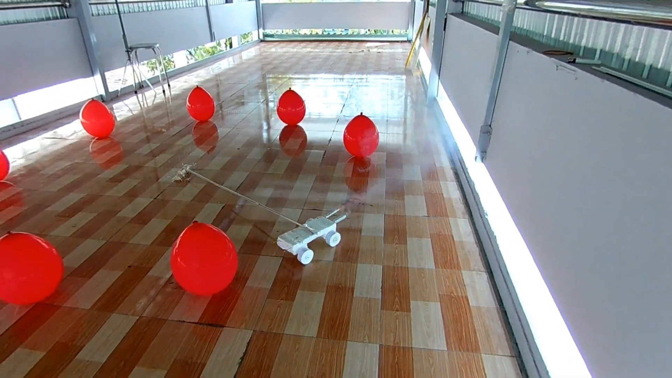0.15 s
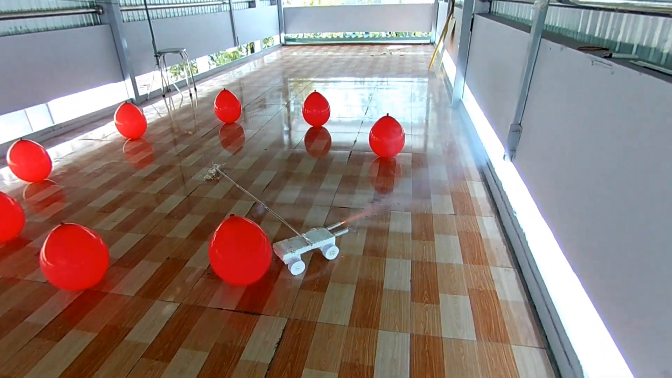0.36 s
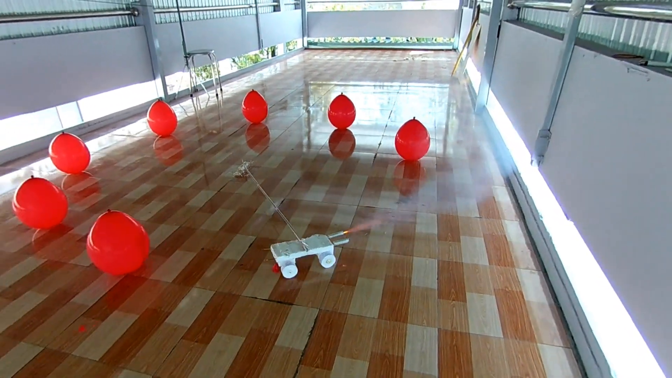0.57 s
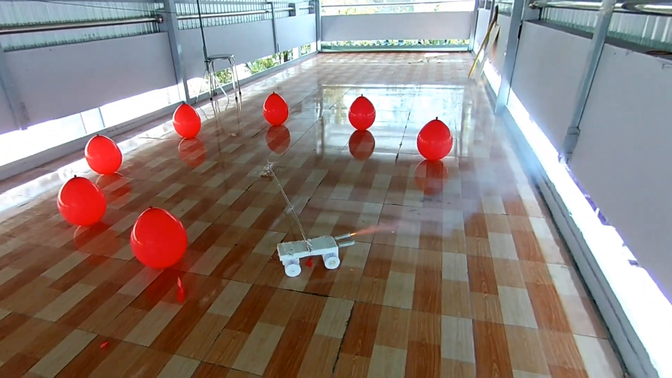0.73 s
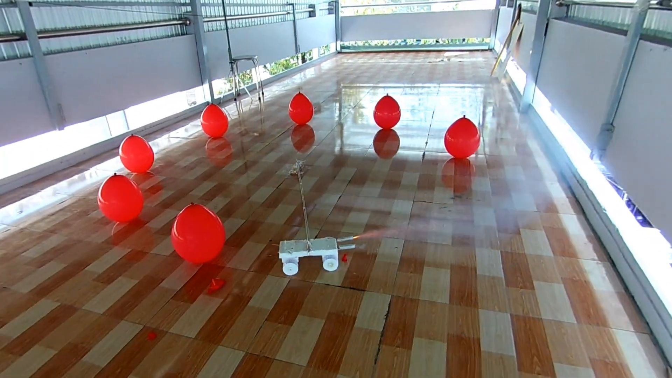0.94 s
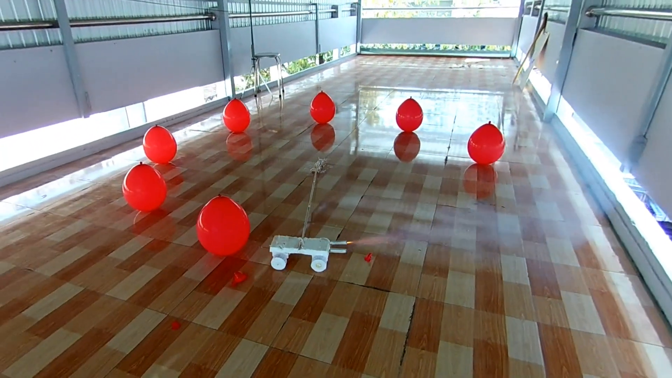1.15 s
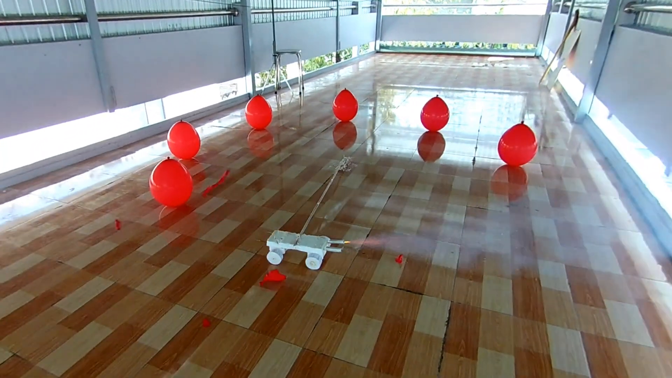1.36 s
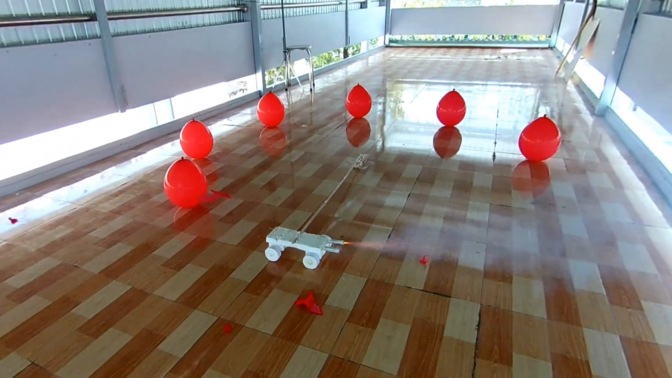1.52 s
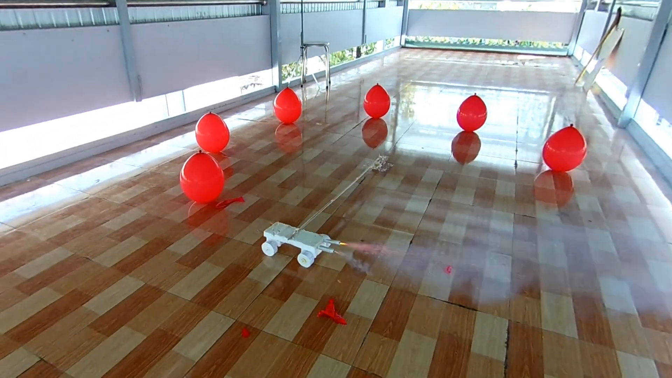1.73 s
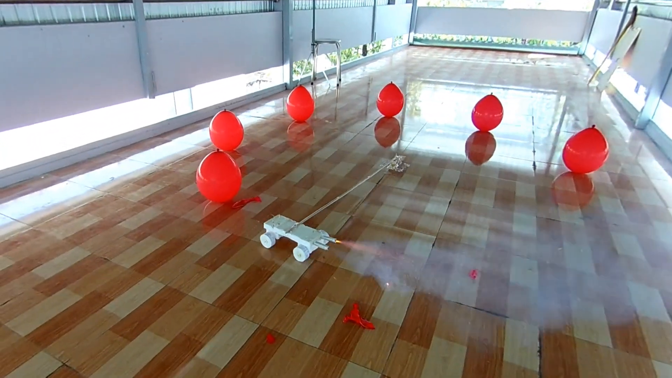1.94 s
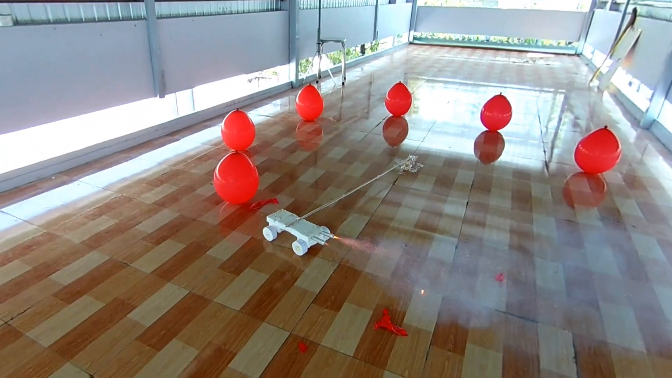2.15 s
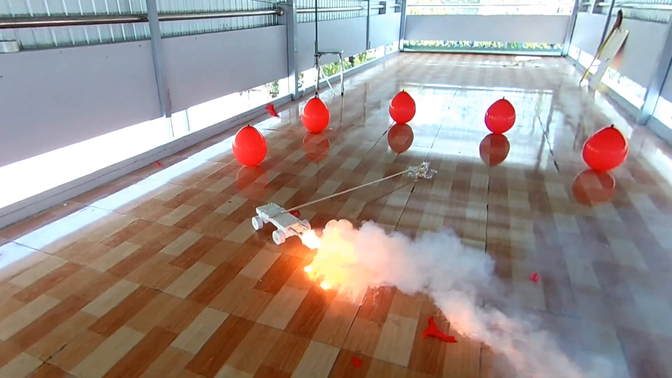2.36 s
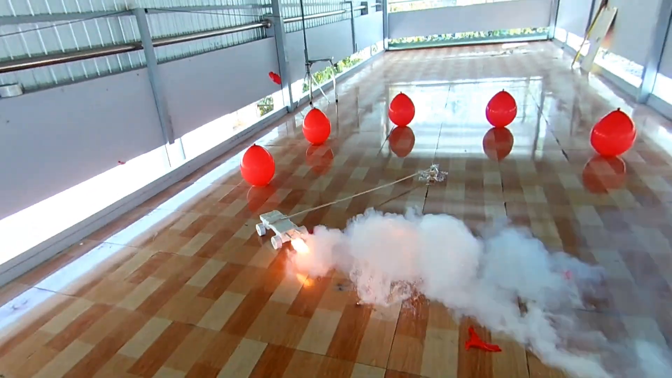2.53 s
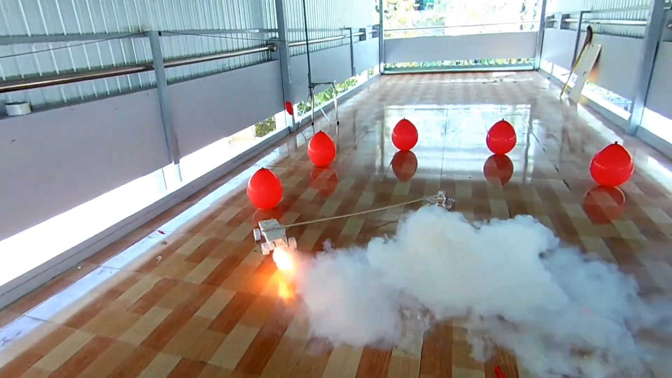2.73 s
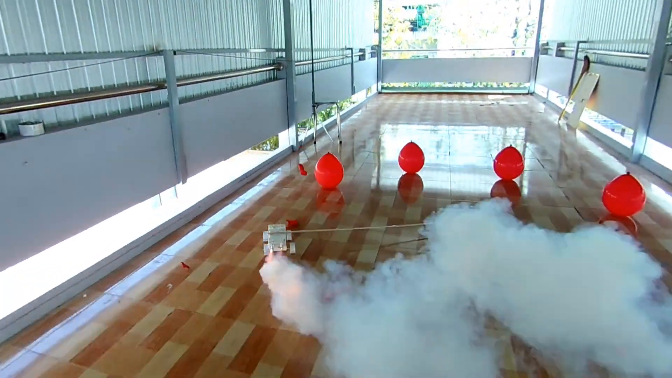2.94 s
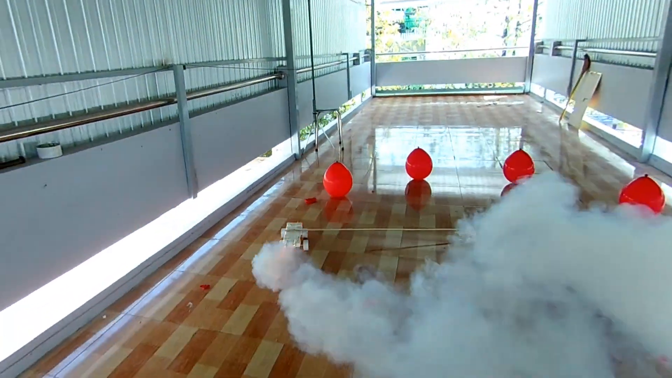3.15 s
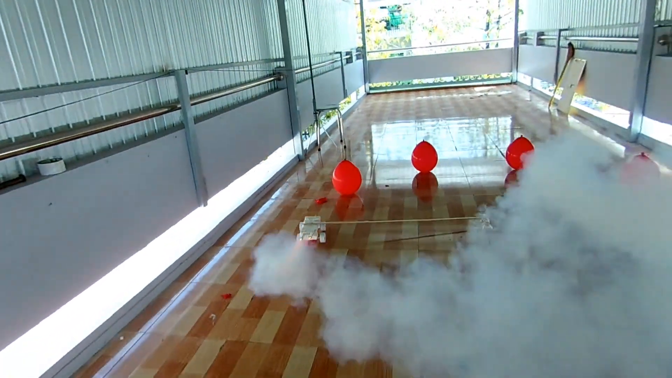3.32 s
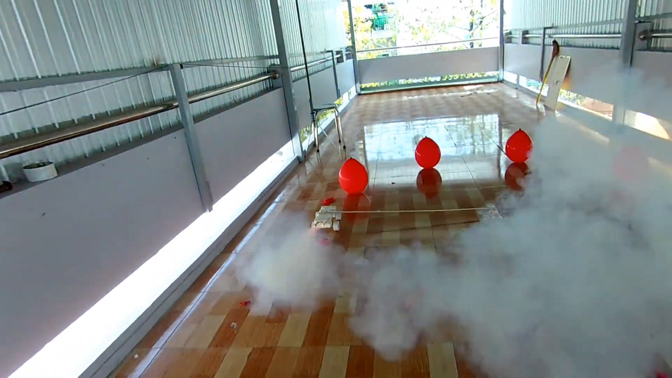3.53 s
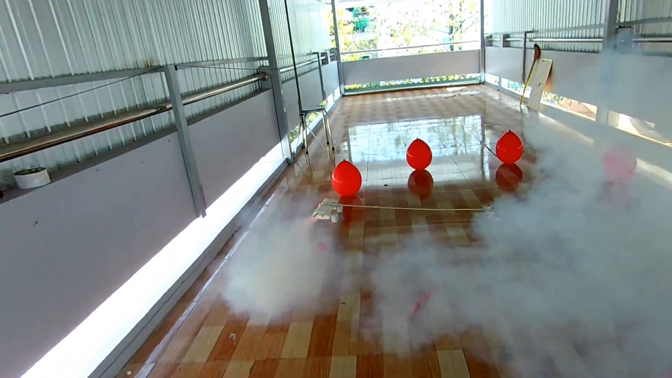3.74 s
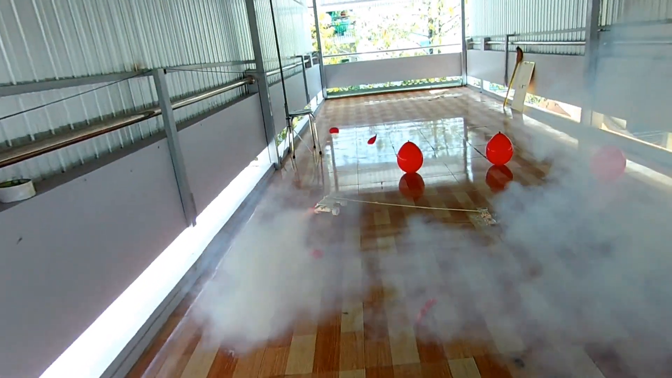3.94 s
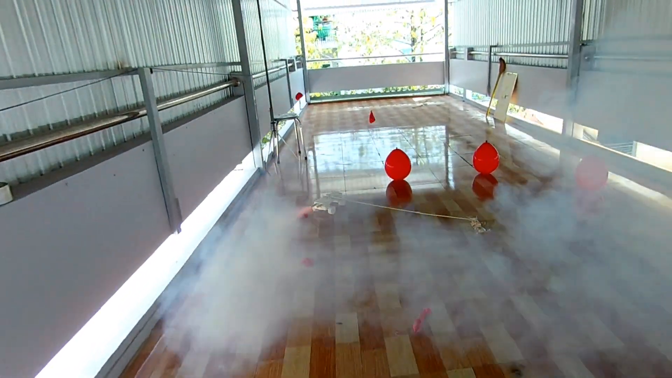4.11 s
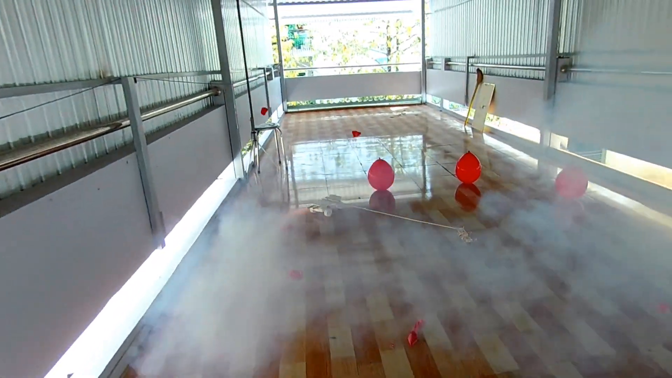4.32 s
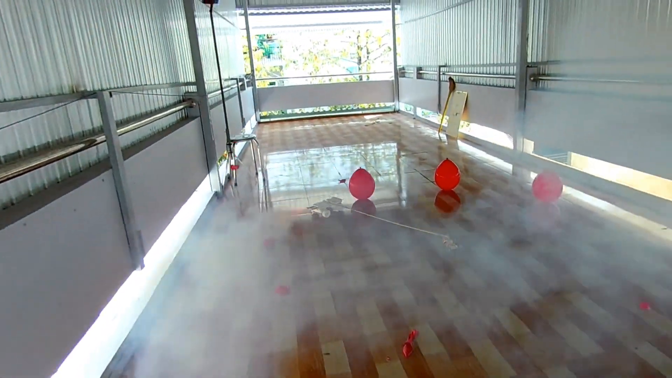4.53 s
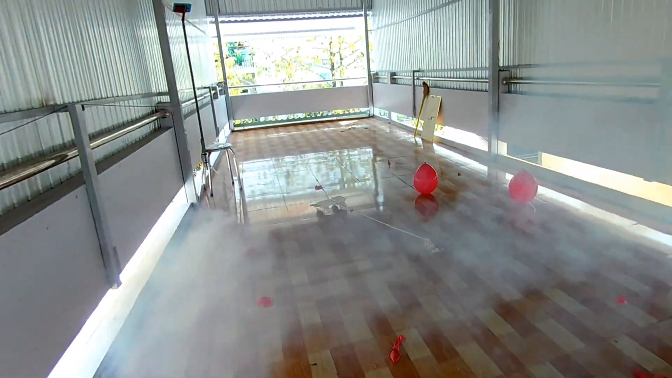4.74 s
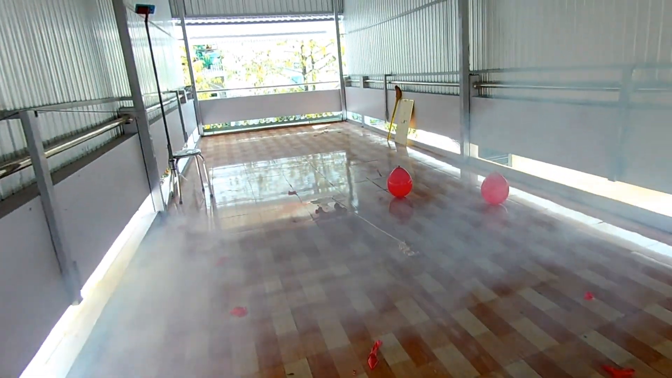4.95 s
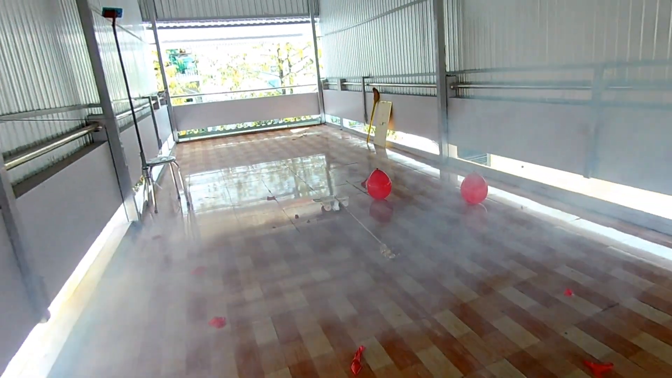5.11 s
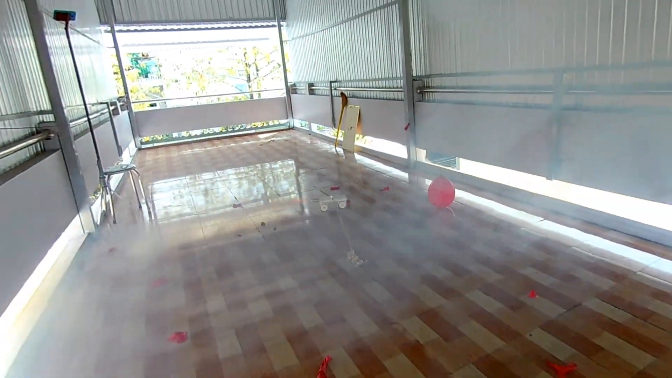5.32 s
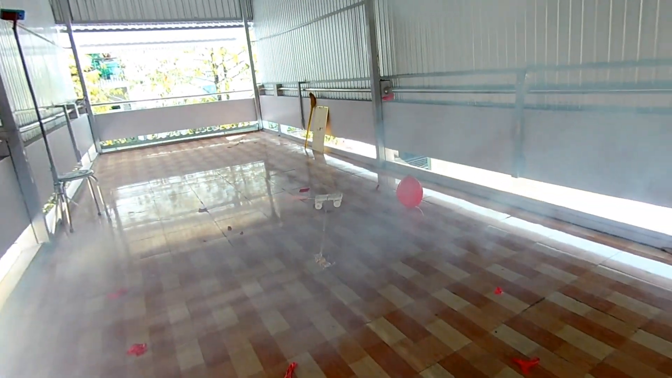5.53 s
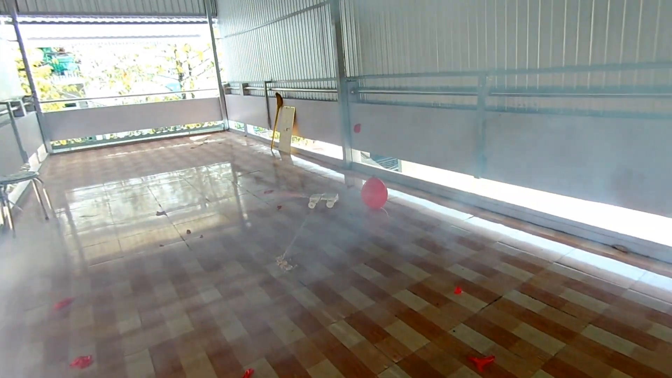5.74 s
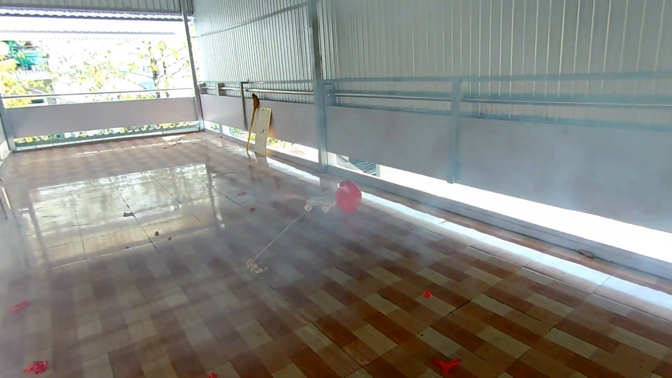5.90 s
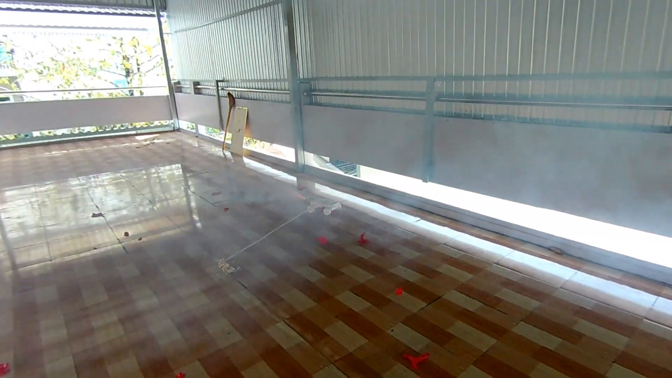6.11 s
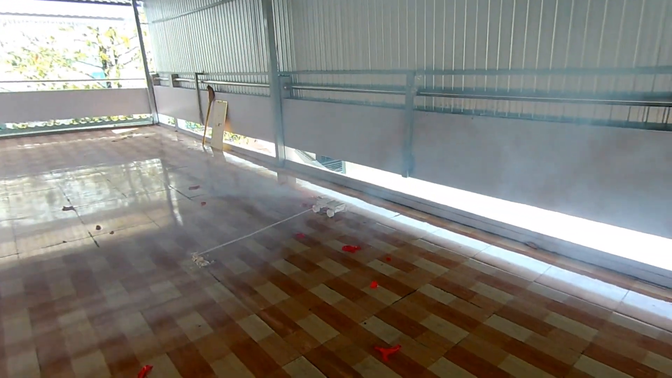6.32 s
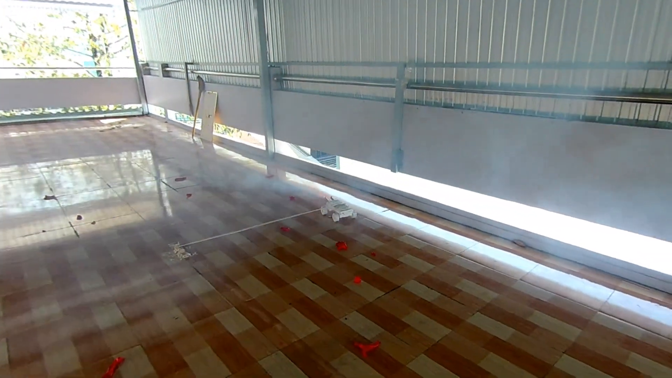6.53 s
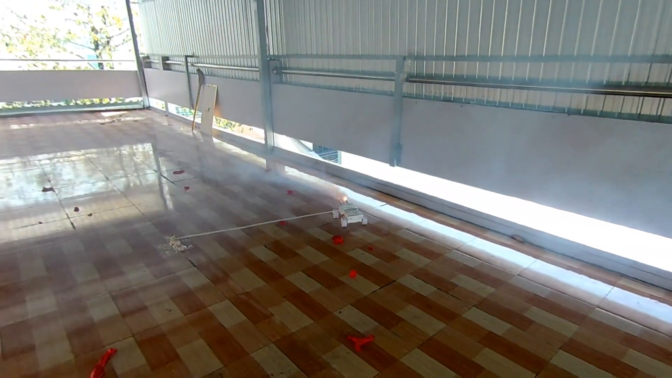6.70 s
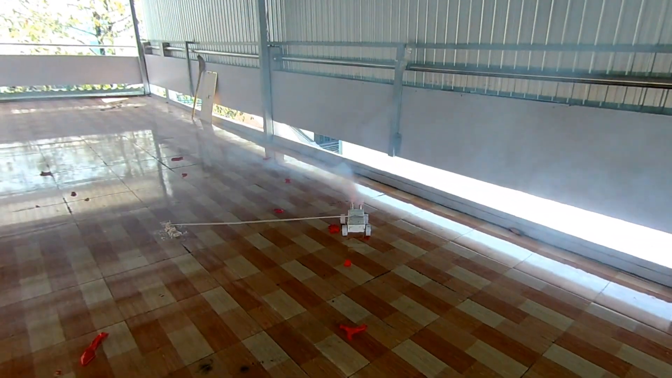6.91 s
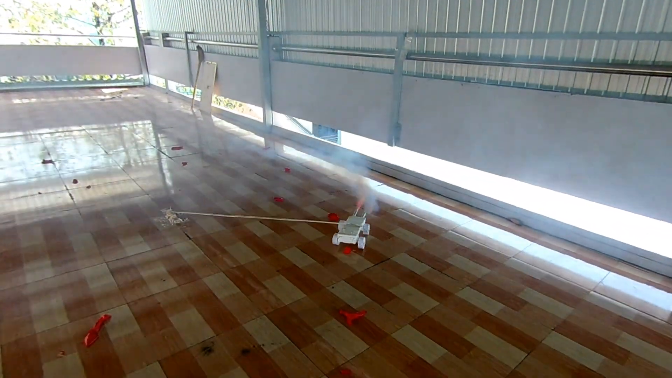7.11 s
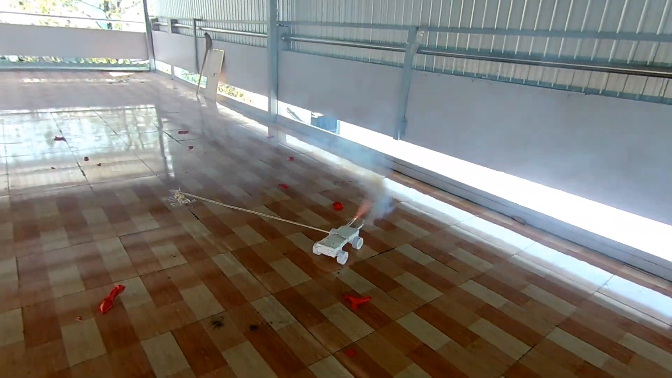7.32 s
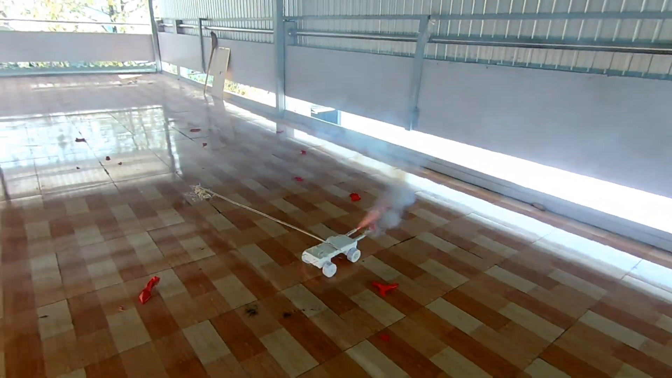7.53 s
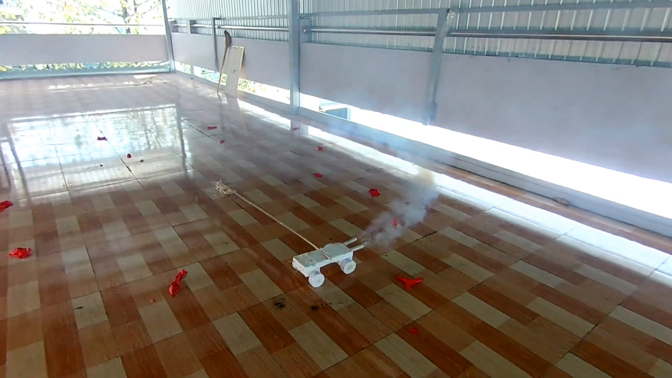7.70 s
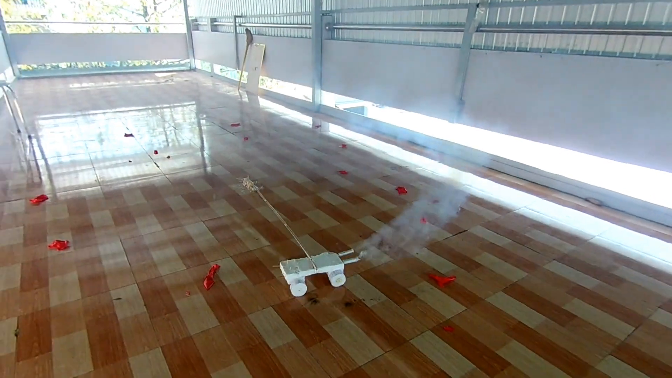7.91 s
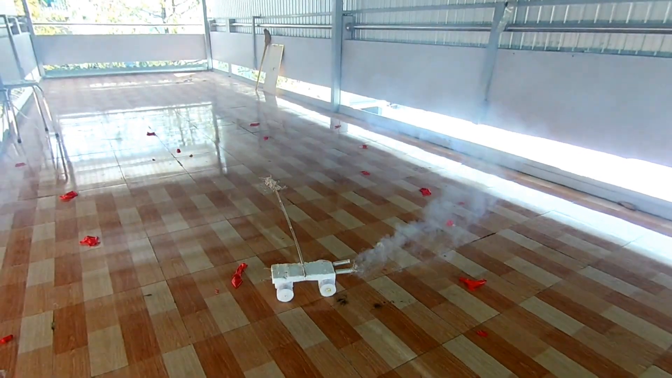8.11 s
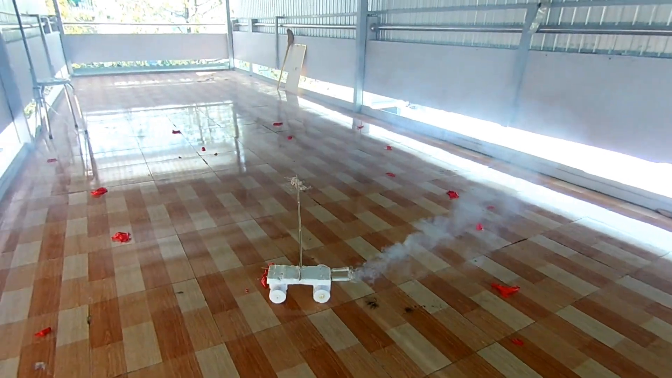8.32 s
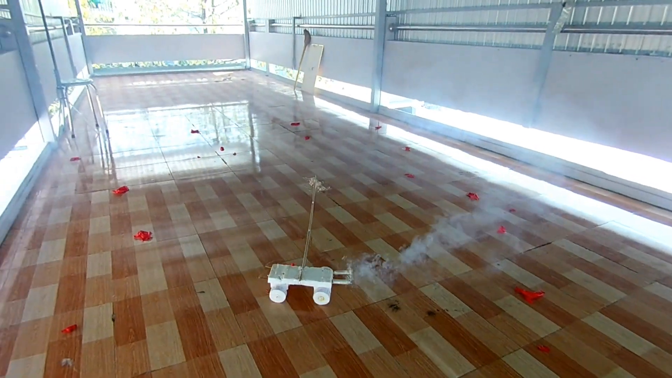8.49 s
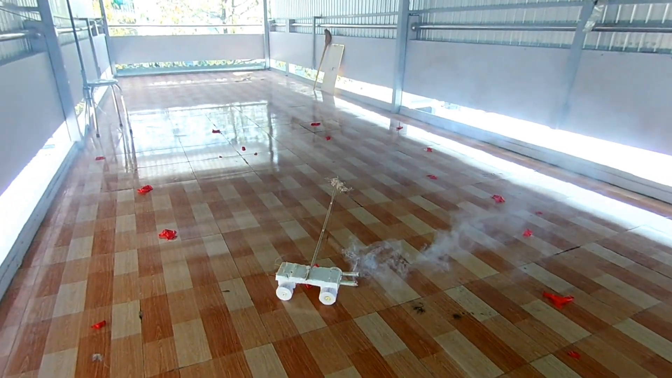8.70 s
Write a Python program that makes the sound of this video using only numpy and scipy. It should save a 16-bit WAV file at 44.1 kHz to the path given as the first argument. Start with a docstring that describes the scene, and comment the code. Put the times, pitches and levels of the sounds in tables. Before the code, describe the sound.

A small rocket motor on a toy car hisses steadily in a large, echoing hall. Balloons burst one after another, a little under a second apart, each sharp bang ringing out and overloading the microphone. Early on, a brief fizz and a quick double bang break the pattern. After the last pop the hiss carries on, growing duller, then the motor spits briefly and dies away.

```python
"""Balloons burst one after another, popped by a toy rocket car circling on a tether in a metal-walled hall.
Each bang is a crack and a shock front that ring through the long hall and overload the microphone.
The motor's turbulent jet hisses throughout, with dull thuds here and there; a fuse fizzes and lights
a second charge with a bang. At last the motor spits sparks and its thrust dies away."""
import sys
import numpy as np
from scipy import signal
from scipy.fft import rfft, irfft
from scipy.io import wavfile
from scipy.ndimage import uniform_filter1d

SR = 44100
rng = np.random.default_rng(int(sys.argv[2]) if len(sys.argv) > 2 else 0)


def wrap_up_sound(samples):
    """Save the sound to the file named by the first command line argument, as 16-bit audio."""
    columns = np.atleast_2d(samples).T
    # keep every value between -1 and 1, then stretch to whole-number steps
    tamed = np.clip(columns, -1, 1)
    steps = np.round(tamed * 32767).astype(np.int16)
    wavfile.write(sys.argv[1], SR, steps)


N = 390575


def gain_of(db):
    """dB to amplitude."""
    return 10 ** (np.asarray(db) / 20)


def unit_rms(x):
    """Scale to rms 1."""
    return x / np.sqrt(np.mean(x ** 2) + 1e-20)


def log_interp(points, hz):
    """Interpolate (hz, value) points over log frequency."""
    point_hz, value = np.transpose(points)
    return np.interp(np.log(hz + 1), np.log(point_hz + 1), value)


def add(mix, start_s, sound):
    """Mix a sound in at start_s."""
    part = mix[round(start_s * SR):][:len(sound)]
    part += sound[:len(part)]


def below(hz, corner_hz):
    """Shelf: 1 under the corner, 0 over it."""
    return 1 / (1 + (hz / corner_hz) ** 4)


def bump(hz, centre_hz, octaves):
    """Broad resonance, height 1."""
    return np.exp(-(np.log2((hz + 1) / centre_hz) / octaves) ** 2)


def smooth_noise(shape, *widths):
    """Noise averaged over one width per axis; rms 1."""
    noise = rng.standard_normal(shape)
    for axis, width in enumerate(widths):
        noise = uniform_filter1d(noise, size=width, axis=axis)
    return unit_rms(noise)


def tinted(noise, colour):
    """Shape noise by (hz, gain_db) points; rms 1."""
    hz = np.fft.rfftfreq(len(noise), 1 / SR)
    return unit_rms(irfft(rfft(noise) * gain_of(log_interp(colour, hz)), len(noise)))


def minimum_phase(x, colour, size=4096):
    """Causal filter from (hz, gain_db) points."""
    hz = abs(np.fft.fftfreq(size, 1 / SR))
    log_gain = np.log(gain_of(log_interp(colour, hz)))
    taps = np.fft.ifft(np.exp(np.conj(signal.hilbert(log_gain)))).real
    return signal.oaconvolve(x, taps[:size // 2])[:len(x)]


def hall_air(level_db=-51):
    """Still air of the hall: faint, low noise."""
    # air spectrum: freq_hz, gain_db
    air_colour = [(25, -6), (60, 1.5), (130, -1.5), (250, -5.5), (380, -7.5), (520, -15), (900, -18.5),
                  (1450, -23), (2200, -36), (3200, -35.5), (15000, -44)]
    return gain_of(level_db) * tinted(rng.standard_normal(N), air_colour)


def hall_rings_db(hz):
    """Boost from narrow resonances of the hall and its sheet walls."""
    # resonances: centre_hz, width_hz, boost_db
    rings = [(160, 13, 3.5), (193, 20, 1), (219, 25, 3), (302, 30, 4.5), (460, 12, 0), (595, 73, 3.5),
             (1075, 43, 2.5), (1320, 26, 0.5), (1743, 49, 4.5), (2800, 72, 2.5), (3840, 98, 2)]
    return sum(db / (1 + (2 * (hz - centre_hz) / width_hz) ** 2) for centre_hz, width_hz, db in rings)


def hall_tail(tint_db, grain_db, ripple_db=1.0, size=65536):
    """Dense, uneven reflections, coloured by tint_db(hz); each band decays at its own rate."""
    # spectrum of a bang as the hall returns it: freq_hz, gain_db
    echo_colour = [(30, -19.5), (80, -21.5), (160, -2), (300, 0), (550, -1), (830, -3.5), (1250, -1.5),
                   (1750, -7), (2300, -13.5), (3200, -18.5), (5000, -26.5), (7000, -28.5), (9000, -29),
                   (15000, -37.5)]
    # reverberation: freq_hz, t60_s
    decay_times = [(60, 0.2), (130, 0.52), (300, 0.68), (1200, 0.77), (2500, 0.81), (5000, 0.81),
                   (9000, 0.51), (15000, 0.38)]
    hz = np.fft.rfftfreq(size, 1 / SR)
    strength = gain_of(grain_db * smooth_noise(size, 90))
    echoes = rng.standard_normal(size) * strength
    modes_db = ripple_db * smooth_noise(len(hz), 90)  # each spot stirs its own mix of room modes
    colour_db = log_interp(echo_colour, hz) + hall_rings_db(hz) + modes_db + tint_db(hz)
    echoes = unit_rms(irfft(rfft(echoes) * gain_of(colour_db)))
    band_hz, t, bands = signal.stft(echoes, SR, nperseg=512)
    decay = gain_of(-60 * t / log_interp(decay_times, band_hz)[:, None])
    return signal.istft(bands * decay, SR, nperseg=512)[1][:size]


def fizz(spread_db=4):
    """Spark showers: the fuse burns into the second charge; the motor spits near its end."""
    # showers: peak_s, level_db, swell_db_per_s, fade_db_per_s
    showers = [(2.227, -19.5, 390, 470), (7.375, -46, 2000, 93), (7.63, -58, 600, 200)]
    # spark spectrum: freq_hz, gain_db
    spark_colour = [(200, -20), (900, 3), (2000, -2), (4000, -5), (8500, -11.5), (11500, -4.5),
                    (15000, -13)]
    t = np.arange(N) / SR
    envelope = sum(gain_of(level_db - np.where(t < peak_s, swell * (peak_s - t), fade * (t - peak_s)))
                   for peak_s, level_db, swell, fade in showers)
    sparks = rng.standard_normal(N) * gain_of(spread_db * rng.exponential(1, N).clip(0, 5))
    return tinted(sparks, spark_colour) * envelope


def thud(level_db, pitch_hz, ring_db, push_s=0.0071, dull_db=6, fade_s=0.13, rise_s=0.002):
    """Dull thud: a soft low knock or sputter with a short hall ring."""
    tail = hall_tail(lambda hz: dull_db * below(hz, 2 * pitch_hz), grain_db=2.0)
    t = np.arange(len(tail)) / SR
    push = np.sin(2 * np.pi * pitch_hz * t) * np.exp(-t / push_s)
    ring = gain_of(ring_db) * tail * np.exp(-t / fade_s)
    onset = 1 - np.exp(-t / rise_s)
    return gain_of(level_db) * (2 * push + ring) * onset


def burn(t, burnout_s=7.474, burnout_db_per_s=19, dull_delay_s=0.1, dull_ramp_s=0.35, dull_db=7.5):
    """Jet level, rumble and brightness in dB: sag as the nozzle wears wider, surges, burn-out."""
    # thrust surges: peak_s, level_db, rumble_db, brightness_db, rise_s, ebb_s
    surges = [(0.166, 1.5, 4.5, 1.5, 0.18, 0.18), (2.7, 3.0, 2, -0.6, 0.52, 3),
              (7.03, 2, -0.5, -1.5, 0.25, 0.12), (7.86, 3.0, -2, -1, 0.04, 0.11)]
    thrust_db = -35.5 - 0.1262 * t
    rumble_db = 1.0 - 0.74 * t
    bright_db = 1.47 - 0.75 * t
    # pressure falls; soon the jet is too slow to hiss
    thrust_db -= burnout_db_per_s * np.maximum(t - burnout_s, 0)
    bright_db -= dull_db * np.clip((t - burnout_s - dull_delay_s) / dull_ramp_s, 0, 1)
    for peak_s, more_db, more_rumble_db, more_bright_db, rise_s, ebb_s in surges:
        surge = np.exp(-((t - peak_s) / np.where(t < peak_s, rise_s, ebb_s)) ** 2)
        thrust_db += more_db * surge
        rumble_db += more_rumble_db * surge
        bright_db += more_bright_db * surge
    return thrust_db, rumble_db, bright_db


def jet(flutter_db=0.02, patchy_db=1.12, chug_db=3.0, drift_db=0.92, hollow=0.25):
    """Turbulent exhaust: hisses, chugs in the bass, turns hollow as pressure falls."""
    # exhaust spectrum: freq_hz, gain_db
    jet_colour = [(30, -8.5), (80, -8), (160, 1.5), (220, -5), (380, 0), (480, -2.5), (600, -0.5),
                  (800, -1.5), (1250, -0.5), (1750, -6), (2300, -9), (3900, -13), (7000, -19), (15000, -29)]
    exhaust = tinted(rng.standard_normal(N), jet_colour)
    hz, t, bands = signal.stft(exhaust, SR, nperseg=1024, noverlap=768)
    hz = hz[:, None]
    thrust_db, rumble_db, bright_db = burn(t)
    flutter, chug = smooth_noise(len(t), 5), smooth_noise(len(t), 5)
    patches = smooth_noise(bands.shape, 12, 10)
    drift = smooth_noise(bands.shape, 70, 2)  # reflections add and cancel as the car circles
    texture_db = flutter_db * flutter + patchy_db * patches + drift_db * drift + .5 * hall_rings_db(hz)
    bass_db = below(hz, 380) * (rumble_db + chug_db * chug)
    # the finest hiss follows brightness most; a weak jet keeps the breathy ring of its tube
    hiss = (1 - below(hz, 2307)) + .7 * (1 - below(hz, 6500))
    tube = hollow * bump(hz, 1550, octaves=0.46)
    tilt_db = (hiss - tube) * bright_db
    # faint nozzle whistle at full pressure
    whistle_db = 2.0 * bump(hz, 3800, octaves=.06) * np.clip(gain_of(2 * bright_db), 0, 2)
    bands *= gain_of(thrust_db + bass_db + tilt_db + texture_db + whistle_db)
    return signal.istft(bands, SR, nperseg=1024, noverlap=768)[1][:N]


def bang(level_db, bass_db, treble_db, low_hz, low_db, high_hz, high_db, echo_s, crack_db,
         swing_hz=450, crack_s=0.0018, near_db=1.0, near_s=0.014,
         hall_db=-3.0, build_s=0.0025, echo_db=-7, echo_width_s=0.012):
    """Crack and shock front; the freed air swings; floor and near walls answer, then the whole hall."""
    def tint_db(hz):
        """Colour of this bang's reflections."""
        rings_db = low_db * bump(hz, low_hz, octaves=0.34) + high_db * bump(hz, high_hz, octaves=0.23)
        return rings_db + bass_db * below(hz, 300) + treble_db * (1 - below(hz, 2200))

    tail = hall_tail(tint_db, grain_db=0.5)
    t = np.arange(len(tail)) / SR
    pressure = gain_of(11) * (1 - np.exp(-t / .0001)) * np.exp(-t / .003)  # far over full scale
    blast = -pressure * (np.cos(2 * np.pi * swing_hz * t) + .5 * np.sin(2 * np.pi * high_hz * t))
    crack = gain_of(crack_db) * rng.standard_normal(len(t)) * np.exp(-t / crack_s)
    near = gain_of(near_db) * np.exp(-t / near_s)
    wall_echo = gain_of(echo_db) * np.exp(-((t - echo_s) / echo_width_s) ** 2)
    reflections = tail * (1 - np.exp(-t / build_s)) * (1 + near + wall_echo)
    return gain_of(level_db) * (crack + blast + gain_of(hall_db) * reflections)


def scene():
    """Jet, sparks, hall air, bangs and thuds; mono."""
    # balloon bursts (third row: the charge lighting):
    # start_s, level_db, bass_db, treble_db, low_hz, low_db, high_hz, high_db, echo_s, crack_db
    bangs = [(0.4362, -0.5, 2, 1.5, 500, 3, 1110, 1.5, 0.038, 6.5),
             (1.3337, 0.5, -0.5, 0.6, 287, 2.5, 1496, 4, .035, -10.5),
             (2.2283, -0.5, -13.5, 7.5, 790, 4, 1206, 1.5, 0.057, 13),
             (2.351, -1, 0.5, 1.5, 165, 4, 1320, 6, 0.066, -7),
             (2.97, -0.5, 2, 3, 497, 4, 1460, 4, 0.065, -22.5),
             (3.9374, -0.35, 3, 1.2, 362, 2.5, 1060, 3, .053, -12),
             (4.7033, -1.15, 3.5, 3, 435, 4.5, 1904, 2.5, 0.064, -16),
             (5.3098, -1.5, 2, 3, 407, 6.5, 2490, 3, 0.061, -20),
             (5.9882, -0.5, -0.5, 2, 605, 4.5, 1590, 5, 0.047, -7)]
    # dull thuds: start_s, level_db, pitch_hz, ring_db
    thuds = [(2.155, -30.5, 400, 5), (2.812, -31, 158, -6), (3.547, -35.5, 170, -1.5),
             (3.801, -29, 167, -16), (4.579, -23.5, 294, 1.5), (4.59, -17.5, 193, -15),
             (6.762, -41, 333, 0), (7.365, -31, 180, -3)]
    mix = jet() + fizz() + hall_air()
    for start_s, *settings in bangs:
        add(mix, start_s, bang(*settings))
    for start_s, *settings in thuds:
        add(mix, start_s, thud(*settings))
    return mix[None]


def record(dry, self_noise_db=-80, cutoff_hz=15650):
    """Microphone: soft overload on the bangs, colour, self-noise, hard clip, band limit."""
    # response with a bass cut and two narrow port dips: freq_hz, gain_db
    mic_colour = [(20, -5.5), (60, 0), (130, -0.5), (2000, 0), (3200, -5), (3900, -1), (4700, -4),
                  (6000, -7), (7200, -11.5), (7700, -20), (8000, -30), (8500, -16.5), (10000, -18),
                  (12600, -15), (13400, -28), (14000, -19), (15500, -27)]
    squashed = dry[0] / (1 + abs(dry[0]) ** 6) ** (1 / 6)
    coloured = minimum_phase(squashed, mic_colour) + gain_of(self_noise_db) * rng.standard_normal(N)
    band_limit = signal.firwin(511, cutoff_hz, window=("kaiser", 9), fs=SR)
    return signal.oaconvolve(np.clip(coloured, -1, 1), band_limit, "same")[None]


dry = scene()
out = record(dry)
wrap_up_sound(out)
```